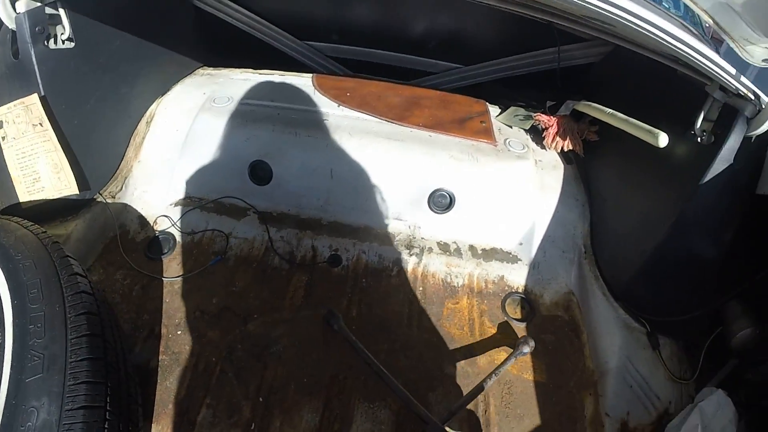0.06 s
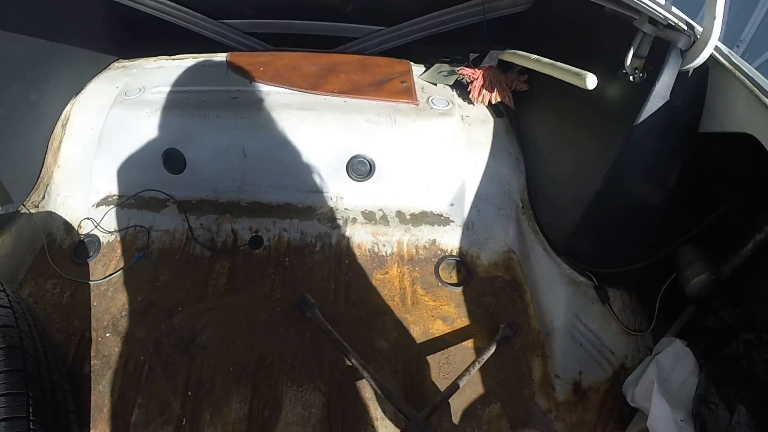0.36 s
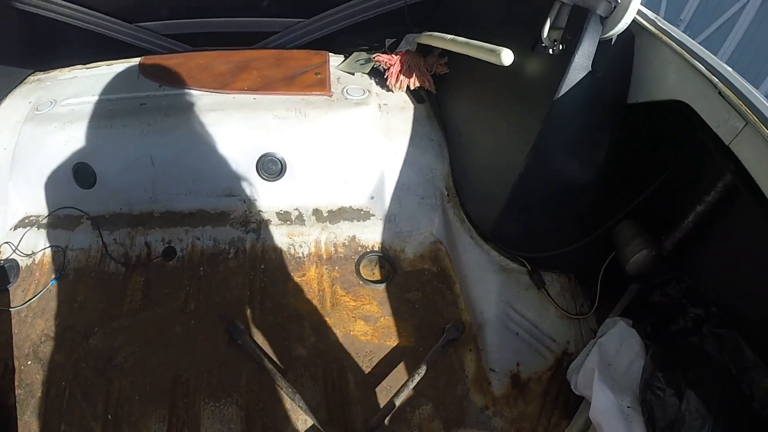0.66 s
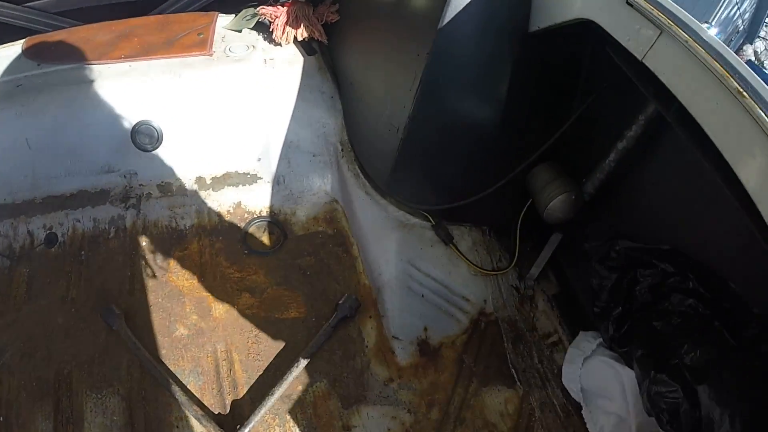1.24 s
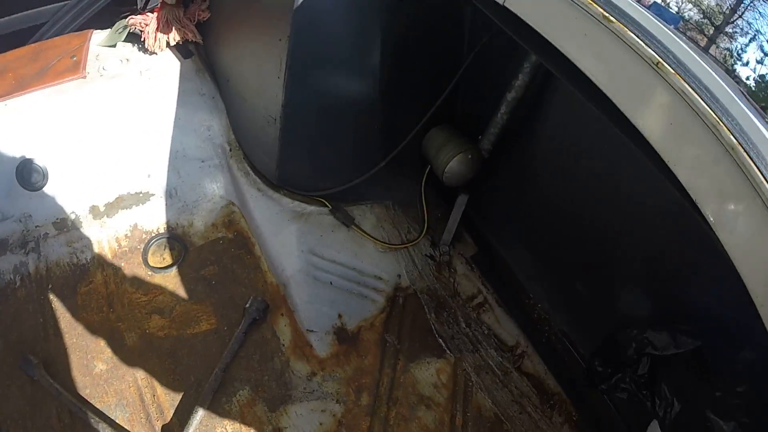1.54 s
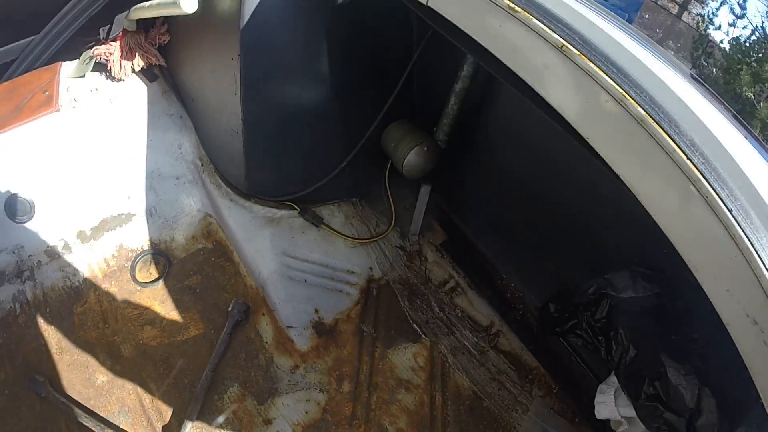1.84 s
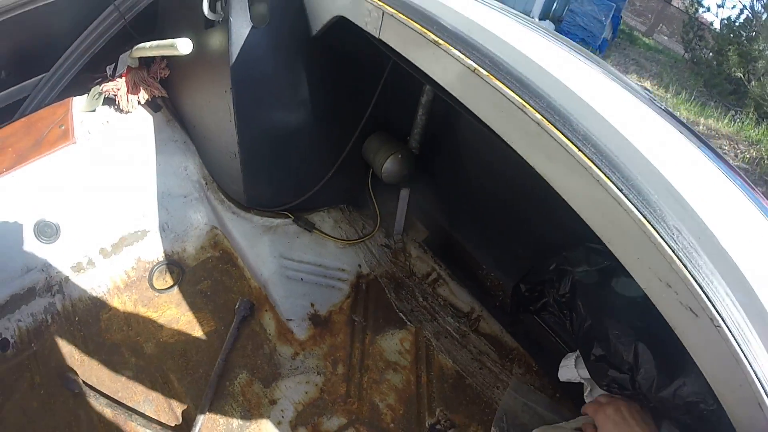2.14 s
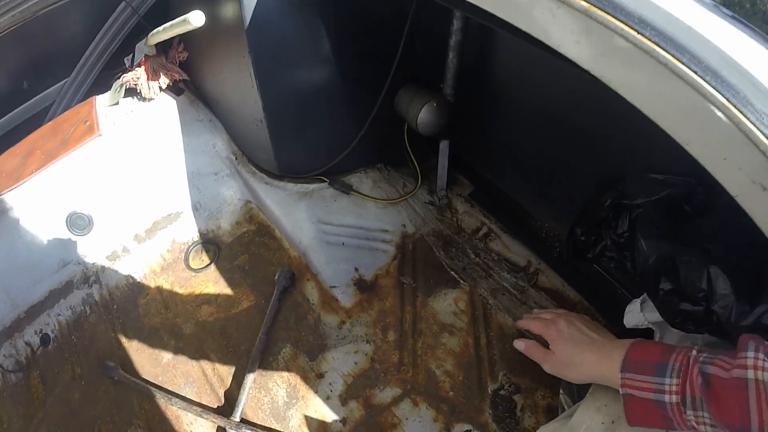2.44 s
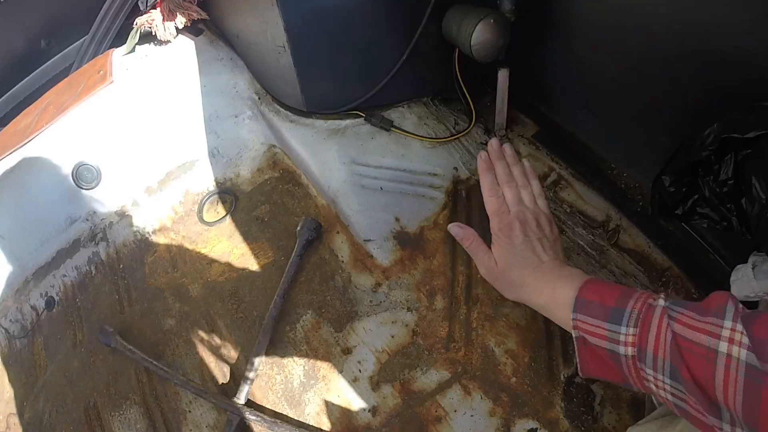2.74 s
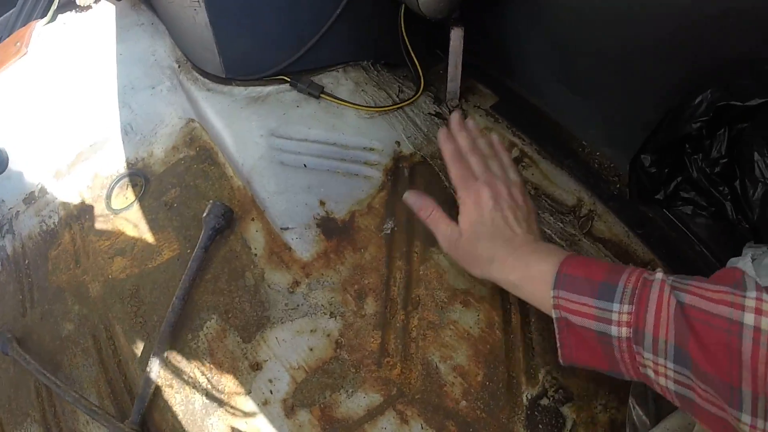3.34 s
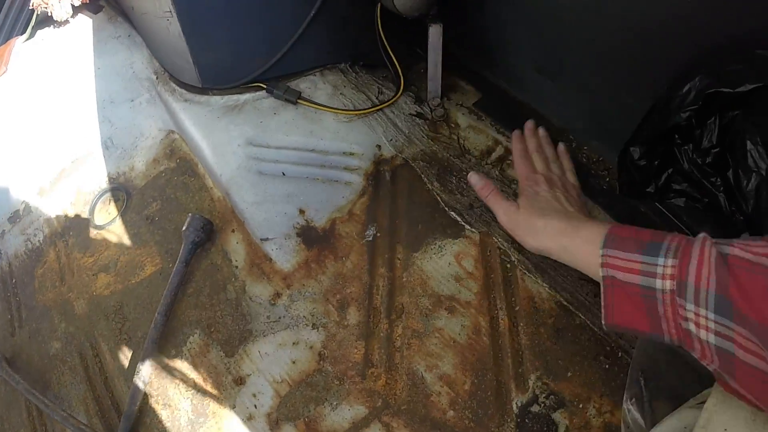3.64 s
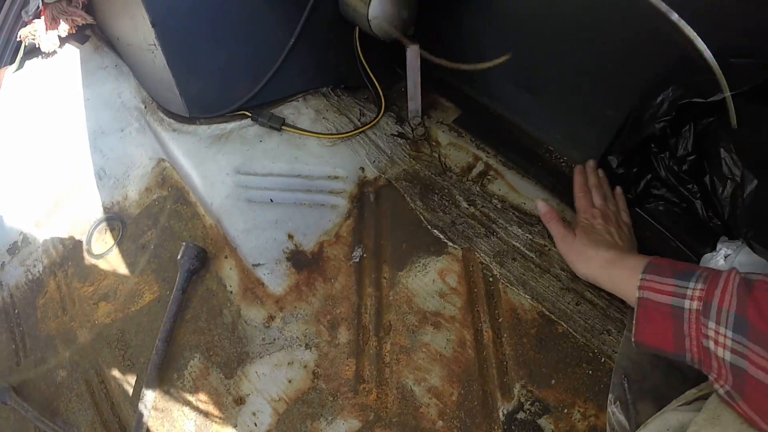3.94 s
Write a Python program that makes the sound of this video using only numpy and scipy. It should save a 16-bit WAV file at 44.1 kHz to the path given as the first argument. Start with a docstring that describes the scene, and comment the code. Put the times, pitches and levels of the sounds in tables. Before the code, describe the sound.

Steel tools clatter in a car trunk, then a hand thumps the metal floor four times.

```python
"""Steel tools knock, scrape and ring on the bare floor of an old car trunk.
A bag is dragged aside, rustling, and dumped with a thump. After one small click, a flat hand
pats the sheet metal four times: each pat slaps, bends the panel and makes the trunk boom.
Behind it are a faint wind rumble and a steady outdoor rush, which the recorder's automatic gain
turns down after loud blows. The close microphone overloads on the hardest ones."""
import sys
import numpy as np
from scipy import signal
from scipy.fft import rfft, irfft
from scipy.io import wavfile
from scipy.ndimage import uniform_filter1d

SR = 44100
rng = np.random.default_rng(int(sys.argv[2]) if len(sys.argv) > 2 else 0)


def transcribe(u):
    """Save the signal u as a 16-bit wav file named by the first command-line argument.

    u: samples, shape (n,) or (channels, n), limited to [-1, 1]; the rate is SR.
    q: integer samples, one column per channel.
    """
    v = np.clip(np.atleast_2d(u).T, -1, 1)
    q = np.round(v * 32767).astype(np.int16)
    wavfile.write(sys.argv[1], SR, q)


N = 176400
T = np.arange(SR) / SR  # one second of time, the length of each short sound


def amp(db):
    """Turns decibels into a number to multiply a sound by."""
    return 10 ** (np.asarray(db) / 20)


def fade(fade_s, hold_s=0):
    """Stays full for hold_s, then dies away. Everywhere, fade_s is the time to fall by 60 dB."""
    return np.exp(-np.log(1000) * np.maximum(T - hold_s, 0) / fade_s)


def read(points, hz):
    """Looks up a value between the rows of a (pitch_hz, value) table, spacing octaves evenly."""
    pitch_hz, value = np.transpose(points)
    return np.interp(np.log(hz + 1), np.log(pitch_hz + 1), value)


def add(mix, start_s, sound):
    """Adds a sound to the mix at its start time."""
    part = mix[max(round(start_s * SR), 0):][:len(sound)]
    part += sound[:len(part)]


def unit(x, size=1100):
    """Scales a sound so that its first `size` samples have an average strength (rms) of 1."""
    return x / np.sqrt(np.mean(x[:size] ** 2) + 1e-20)


def colour(x, spectrum, size=8192):
    """Makes each pitch louder or softer, following a (pitch_hz, level_db) table."""
    hz = abs(np.fft.fftfreq(size, 1 / SR))
    log_gain = np.log(amp(np.maximum(read(spectrum, hz), -100)))
    response = np.exp(np.conj(signal.hilbert(log_gain)))  # nothing sounds ahead of a hit
    taps = np.fft.ifft(response).real[:size // 2]
    return signal.fftconvolve(x, taps)[:len(x)]


def balance(x, levels_db, size=1100):
    """Filters a blow so that its start comes near the given level in five bands, bass to treble."""
    # borders of the five bands: edge_hz
    band_edges = [35, 160, 600, 2200, 4500, 16000]
    hz = np.array(band_edges)
    power = abs(rfft(x[:size], SR)) ** 2 * 2 / (SR * size)
    now_db = [10 * np.log10(power[low:high].sum() + 1e-20) for low, high in zip(hz, hz[1:])]
    centres_hz = np.sqrt(hz[1:] * hz[:-1])
    return colour(x, list(zip(centres_hz, np.array(levels_db) - now_db)))


def burst(spectrum, fades, hold_s):
    """Countless close tones blur into noise; after hold_s, each band dies at its own speed."""
    noise = rfft(rng.standard_normal(SR))
    centres_hz = np.geomspace(60, 12000, num=8)
    out = np.zeros(SR)
    for hz, share in zip(centres_hz, np.eye(len(centres_hz))):
        band_gain = read(list(zip(centres_hz, share)), np.arange(len(noise)))
        out += irfft(noise * band_gain, SR) * fade(read(fades, hz), hold_s)
    return unit(colour(out, spectrum))


def ring(tones, pitch_ratio=1, scatter_db=0):
    """An object's own tones die away; scatter_db varies their levels, as hitting a new spot does."""
    out = np.zeros(SR)
    for hz, db, fade_s in tones:
        gain = amp(db + scatter_db * rng.standard_normal())
        out += gain * fade(fade_s) * np.sin(2 * np.pi * hz * pitch_ratio * T)
    return out


def struck(tones, hits):
    """A small object's tones swell and ring on after each hit."""
    out = np.zeros(N)
    ringing = sum(ring([tone]) * (1 - np.exp(-T / swell_s)) for *tone, swell_s in tones)
    for start_s, db in hits:
        add(out, start_s, amp(db) * ringing)
    return out


def chatter(length_s, count=6):
    """A few quick, random taps as steel settles."""
    out = np.zeros(SR)
    strengths = rng.standard_normal(count)
    times_s = np.r_[0, rng.random(count - 1)] * length_s
    out[(times_s * SR).astype(int)] = strengths
    return out


def flow(spectrum, levels, flutter_db):
    """Fluttering noise that grows and shrinks along a (time_s, level_db) table."""
    flutter = unit(uniform_filter1d(rng.standard_normal(N), size=900), size=N)
    noise = colour(rng.standard_normal(N), spectrum)
    level_db = np.interp(np.arange(N) / SR, *np.transpose(levels))
    return unit(noise * amp(flutter_db * flutter), size=N) * amp(level_db)


def outdoors():
    """Wind rumbles under a steady rush that the recorder turns down after loud blows."""
    # tone colour of the rush and the rumble: pitch_hz, level_db
    rush_spectrum = [(88, -38), (150, -6.5), (398, -9), (534, -5), (1020, -6.5), (1100, -8.5), (1500, -6),
                     (2140, -23), (3550, -22.5), (4490, -37), (10800, -41.5), (13400, -40), (15100, -61),
                     (16000, -59)]
    rumble_spectrum = [(20, -7.5), (35, -19), (48, 6.5), (75, 5.5), (115, -7.5), (180, -7), (400, -10.5),
                       (1500, -72)]
    # the rush dips and slowly comes back, a set curve imitating automatic gain: time_s, level_db
    rush_gain = [(0, -55), (.8, -62), (1.3, -57), (1.9, -50), (2.3, -46), (2.91, -48.5), (2.95, -62),
                 (3.2, -59), (3.5, -56.5), (3.62, -52.5), (4, -62)]
    # how loud the rumble is: time_s, level_db
    rumble_levels = [(0, -28.5), (1.1, -26), (1.4, -36), (1.899, -38.5), (2.9, -43.5), (3.1, -40.5),
                     (4, -43.5)]
    rush = flow(rush_spectrum, rush_gain, flutter_db=0.43)
    return rush + flow(rumble_spectrum, rumble_levels, flutter_db=1.5)


def sleeve(release_s=0.0085):
    """Cloth brushes briefly as the arm lifts."""
    # brushes of the sleeve: start_s, level_db, hold_s
    brushes = [(3.766, -59.5, .02), (3.791, -66, 0.066), (3.865, -59, 0.0043)]
    # tone colour of the cloth: pitch_hz, level_db
    cloth_spectrum = [(1000, -22), (2400, -10), (3600, 1), (5000, -12), (7000, -9), (15000, -20)]
    out = np.zeros(N)
    for start_s, db, hold_s in brushes:
        rub = rng.standard_normal(SR) * np.exp(-np.maximum(T - hold_s, 0) / release_s)
        add(out, start_s, amp(db) * unit(colour(rub, cloth_spectrum)))
    return out


def click():
    """Something small and hard touches twice, so quickly that it sounds like one click."""
    # tones of the click: pitch_hz, level_db, fade_s, swell_s
    tones = [(655, -7, 0.051, 0.00068), (1060, 0.5, 0.015, 0.00084), (1710, 5.5, 0.016, 0.00082),
             (1816, -10, 0.017, 0.0013), (2880, -1.5, 0.013, .001), (3350, -2.5, 0.012, 0.00071),
             (3490, -14, 0.018, 0.00089), (4850, -6.5, 0.0088, 0.00053), (6562, -30, 0.022, 0.00081)]
    # the two touches: start_s, level_db
    hits = [(2.5763, -33), (2.578, -16.5)]
    return struck(tones, hits)


def bag_drag_and_hiss():
    """The bag rubs and rustles; a faint hiss stays until the recorder turns it down at the first pat."""
    # tone colour of the rub, and of the rustle and hiss: pitch_hz, level_db
    rub_spectrum = [(120, -37), (200, -1.5), (762, -4.5), (820, -11.5), (950, 2), (1100, -14), (1450, -4),
                    (2170, -26), (3490, -15.5), (4940, -33), (9740, -29), (14600, -36), (16000, -41)]
    rustle_hiss_spectrum = [(2000, 11), (3600, 11), (4800, 0), (6500, 3.5), (10500, -1), (15000, -21.5)]
    # set loudness curves, with only steady hiss from 2.46 s: time_s, level_db
    rub_levels = [(1.1, -48), (1.23, -45), (1.26, -45), (1.36, -40), (1.47, -34.5), (1.62, -42.5),
                  (1.8, -48.5), (1.95, -89)]
    rustle_hiss_levels = [(.82, -108), (.9, -76), (1.15, -63), (1.3, -50), (1.45, -52), (1.6, -45),
                          (1.65, -58), (1.75, -53), (1.88, -64.5), (2.05, -54), (2.15, -63), (2.36, -51),
                          (2.46, -63), (2.9, -63), (3, -89)]
    rub = flow(rub_spectrum, rub_levels, flutter_db=2.0)
    return rub + flow(rustle_hiss_spectrum, rustle_hiss_levels, flutter_db=1.7)


def floor_sway(pitch_hz=54.5, rise_s=.012, fade_s=.3):
    """The whole floor hums at its lowest tone while the load shifts on it."""
    # sways of the floor: start_s, level_db, hold_s
    sways = [(0.82, -11.5, 0.213), (1, -32, .04)]
    out = np.zeros(N)
    for start_s, db, hold_s in sways:
        swell = np.minimum(T / rise_s, 1) * fade(fade_s, hold_s)
        add(out, start_s, amp(db) * swell * np.sin(2 * np.pi * pitch_hz * T))
    return out


def wrench(stop_s=0.53, release_s=.03):
    """A knocked wrench rings freely until the skidding of the steel chokes it."""
    # tones of the wrench: pitch_hz, level_db, fade_s, swell_s
    tones = [(2169, -5, 2.2, .1), (2735, -9, .9, .15), (2826, -4, 3, .3), (3289, 6, 3, .22),
             (4690, -18, .8, .03), (5373, -5, 1.15, .04)]
    # the knock that sets it ringing: start_s, level_db
    hits = [(.008, -42.5)]
    choke = np.exp(-np.maximum(np.arange(N) / SR - stop_s, 0) / release_s)
    return choke * struck(tones, hits)


def steel_bar():
    """A steel bar is knocked three times and rings on with high, thin tones."""
    # tones of the bar: pitch_hz, level_db, fade_s, swell_s
    tones = [(2143, 0, .7, .02), (2622, -2, .7, .02), (2840, -7, 1.6, .05), (3117, -3, .7, .02),
             (3591, -3, .6, .02), (4250, -9, .3, .01), (5895, -11, .6, .02), (8102, -17, .6, .02),
             (8430, -16, .4, .01)]
    # the knocks that set it ringing: start_s, level_db
    hits = [(.83, -54), (.889, -42.5), (1.026, -50)]
    return struck(tones, hits)


def tool_skids(slips_per_s=1500, grit_db=-18):
    """Steel sticks and slips on the floor, so each short skid scrapes and squeals at one pitch."""
    # skids of the steel: start_s, level_db, hold_s, squeal_hz
    skids = [(.428, -18.5, 0.019, 1420), (0.47, -23.5, 0.013, 1380), (.499, -24.5, 0.025, 1792),
             (.524, -27.5, 0.018, 1380), (0.543, -27.5, 0.023, 1698), (0.574, -25, 0.0099, 1340),
             (0.6, -28.5, 0.013, 1433)]
    # tone colour of the scrape: pitch_hz, level_db
    scrape_spectrum = [(180, -15), (300, -0.5), (478, -17.5), (787, -5.5), (855, -14.5), (1390, -6),
                       (1750, -11.5), (2140, -23.5), (3400, -15), (4440, -40.5), (6190, -35), (14700, -46),
                       (16000, -80)]
    out = np.zeros(N)
    for start_s, db, hold_s, squeal_hz in skids:
        noise = rng.standard_normal(SR)
        slips = rng.random(SR) < slips_per_s / SR
        rub = noise * (slips + amp(grit_db)) * fade(fade_s=.055, hold_s=hold_s)
        scrape = unit(colour(rub, scrape_spectrum))
        squeal_tone = ring([(squeal_hz, 0, .07)])  # fades in 0.07 s
        squeal = unit(signal.fftconvolve(rub, squeal_tone)[:SR])
        add(out, start_s, amp(db) * unit(scrape + squeal))
    return out


def bag_and_hand_thumps(smack_db=6, pop_db=-4.5, panel_db=7.5, boom_rise_s=0.016):
    """A soft, heavy blow slaps and pops trapped air; then the panel bends and the trunk booms."""
    # the bag landing, then four pats: start_s, bass_db, body_db, slap_db, edge_db, treble_db,
    # slap_hz, contact_s, panel_pitch_ratio, bend_delay_s, boom_db
    blows = [(1.48, -13.5, -18.5, -14, -38, -46.5, 1066, 0.019, .86, 0.0095, -4.5),
             (2.9276, -11, -15.5, -18.5, -30.5, -40.5, 1880, 0.00033, 1.04, 0.0029, -6.5),
             (3.2078, -10, -22.5, -23, -34.5, -46.5, 1780, 0.0015, 1.16, 0.0028, -7.5),
             (3.579, -13, -16.5, -29.5, -35.5, -43.5, 1307, 0.006, .95, 0.00266, -5),
             (3.898, -13, -17.5, -18, -29, -43.5, 1163, 0.007, .88, 0.00708, -14)]
    # tone colour of the slap and the boom: pitch_hz, level_db
    slap_spectrum = [(21, -38), (35, -31.5), (111, 5), (265, -15.5), (379, -19), (543, -33.5), (617, -17),
                     (883, -27), (1110, -25.5), (1200, -26.5), (1510, -26), (2660, -48), (3430, -36),
                     (4550, -54.5), (10300, -49), (14400, -66), (16000, -115)]
    boom_spectrum = [(35, -18.5), (55, -7.5), (75, -2.5), (115, -1), (150, -7), (180, -13), (220, -14.5),
                     (300, -16.5), (450, -18), (700, -28), (1400, -32.5), (2300, -48), (3500, -47),
                     (5000, -52), (14000, -50.5)]
    # how long each lasts, from low to high: pitch_hz, fade_s
    slap_fades = [(100, 0.033), (400, 0.12), (1500, 0.056), (3500, .06), (9000, 0.064)]
    boom_fades = [(70, 1.12), (140, 1.03), (220, 0.58), (450, 0.68), (1400, 0.43), (3500, 0.2),
                  (9000, 0.18)]
    # tones of the trapped air: ratio_to_slap_pitch, level_db, base_fade_s
    air_tones = [(0.99, -2, 0.0076), (0.351, -4, 0.012)]
    # tones of the floor panel under a soft blow: base_pitch_hz, level_db, fade_s
    panel_tones = [(85, -3, 0.27), (115, -1, 0.14), (223, -12.5, 0.21), (334, -7, 0.11), (449, -18.5, 0.26)]
    snap = unit(colour(signal.unit_impulse(SR), slap_spectrum))
    out = np.zeros(N)
    for start_s, *levels_db, slap_hz, contact_s, pitch_ratio, bend_delay_s, boom_db in blows:
        blow = snap + amp(smack_db) * burst(slap_spectrum, slap_fades, contact_s)
        pop_tones = [(ratio * slap_hz, db, fade_s + 2 * contact_s) for ratio, db, fade_s in air_tones]
        blow += amp(pop_db) * unit(ring(pop_tones))
        add(blow, bend_delay_s, -amp(panel_db) * unit(ring(panel_tones, pitch_ratio)))
        swell = 1 - np.exp(-T / boom_rise_s)
        boom = unit(burst(boom_spectrum, boom_fades, contact_s) * swell, size=6000)
        add(out, start_s, balance(blow + amp(boom_db) * boom, levels_db))
    return out


def tool_knocks(ring_db=-3, echo_db=-8.5, pitch_spread=.025):
    """Tools rattle on the metal floor, which clangs and rings on into the trunk."""
    # tools hitting the floor: start_s, bass_db, body_db, clang_db, edge_db, treble_db, rattle_s
    knocks = [(.005, -17.5, -19, -17.5, -38, -46, 0.015), (.192, -21.5, -19.5, -20.5, -35, -38.5, 0.012),
              (0.3, -27, -16.5, -20.5, -36.5, -45.5, .014), (0.633, -12, -13.5, -13, -25.5, -37.5, 0.011),
              (0.822, -27, -27.5, -25, -36, -47.5, 0.014),
              (0.884, -19.5, -12.5, -18.5, -26.5, -29.5, 0.017), (.944, -30, -29.5, -16, -32, -43.5, 0.013),
              (0.979, -29, -17, -20, -29.5, -42.5, 0.014), (1.023, -17.5, -22, -22, -35.5, -47, 0.018),
              (1.055, -24.5, -23.5, -24, -39.5, -56, .016), (1.108, -27, -53, -30.5, -59, -66, 0.00957),
              (1.252, -39, -43, -36.5, -64, -59, .008)]
    # tones of the floor under steel: pitch_hz, level_db, fade_s
    floor_tones = [(68, 2, .55), (104, -8, .3), (151, -10, .55), (186, -9, .3), (275, -9, .4),
                   (326, -13, .3), (354, -13, .25), (447, -10, .37), (480, -6, .5), (656, -9, .3),
                   (805, -7, .24), (879, -8, .3), (1095, -7, .28), (1387, -8, .26), (1497, -8, .24),
                   (1725, -12, .22)]
    # tone colour of the clang: pitch_hz, level_db
    clang_spectrum = [(21, -16.5), (35, -11.5), (75, 2), (147, -18), (205, -14.5), (325, -8), (466, -11),
                      (586, -19.5), (666, -14.5), (883, -16.5), (954, -20.5), (1080, -13), (1260, -14.5),
                      (1370, -15.5), (1760, -21.5), (1950, -30), (3710, -34), (4920, -55), (6040, -45),
                      (7410, -52.5), (9820, -55), (13700, -60.5), (16000, -78)]
    # how long the clang and its echo in the trunk last: pitch_hz, fade_s
    clang_fades = [(60, 0.11), (300, 0.35), (1200, 0.084), (3500, 0.11), (9000, 0.03)]
    echo_fades = [(70, 1), (200, 0.73), (500, 0.5), (1400, 0.38), (3500, 0.27), (9000, 0.15)]
    out = np.zeros(N)
    for start_s, *levels_db, rattle_s in knocks:
        taps = chatter(rattle_s)
        pitch_ratio = 1 + pitch_spread * rng.uniform(-1.026, 1)
        one_ring = ring(floor_tones, pitch_ratio, scatter_db=2)
        ringing = unit(signal.fftconvolve(taps, one_ring)[:SR])
        clang = burst(clang_spectrum, clang_fades, rattle_s) * np.interp(T, [0, rattle_s / 2], [0.99, 1])
        echo = burst(clang_spectrum, echo_fades, rattle_s)
        knock = clang + amp(ring_db) * ringing + amp(echo_db) * echo
        add(out, start_s, balance(knock, levels_db))
    return out


def scene():
    """Mixes the tools, bag, hand, click and background into one channel."""
    tools = tool_knocks() + floor_sway() + tool_skids() + wrench() + steel_bar()
    mix = tools + bag_drag_and_hiss() + outdoors() + bag_and_hand_thumps() + click() + sleeve()
    return mix[None]


def record(dry, low_cut_hz=50, peak_limit=1.22, high_cut_hz=15700):
    """The microphone drops the deepest bass, rounds off the loudest peaks and cuts the top treble."""
    bass_cut = signal.butter(4, low_cut_hz, "high", fs=SR, output="sos")
    thinned = signal.sosfilt(bass_cut, dry)
    rounded = thinned / (1 + (thinned / peak_limit) ** 6) ** (1 / 6)
    treble_cut = signal.firwin(255, high_cut_hz, window=("kaiser", 9), fs=SR)
    return signal.oaconvolve(rounded, treble_cut[None], "same")


dry = scene()
out = record(dry)
transcribe(out)
```